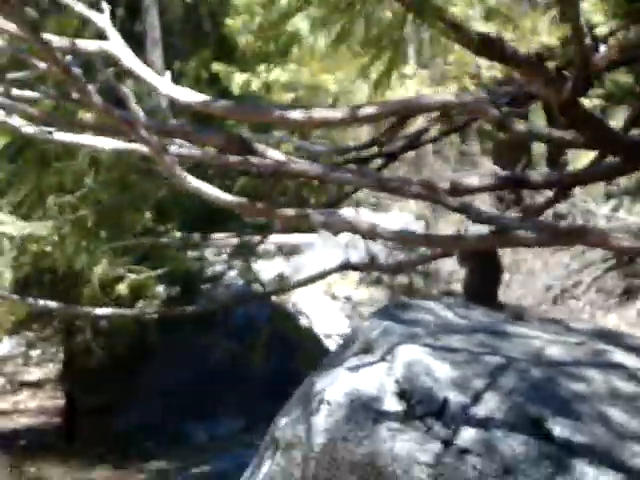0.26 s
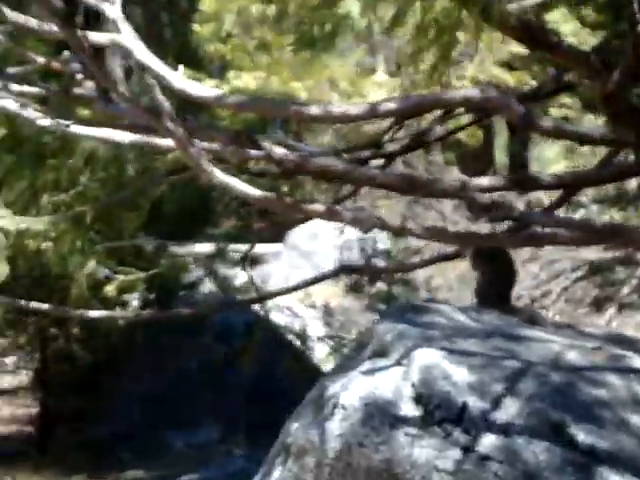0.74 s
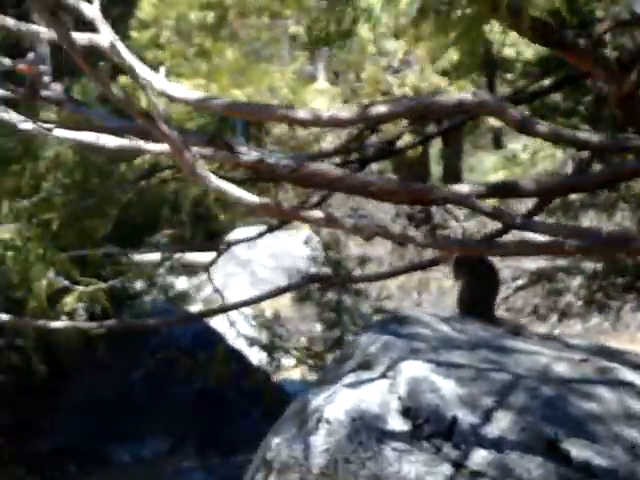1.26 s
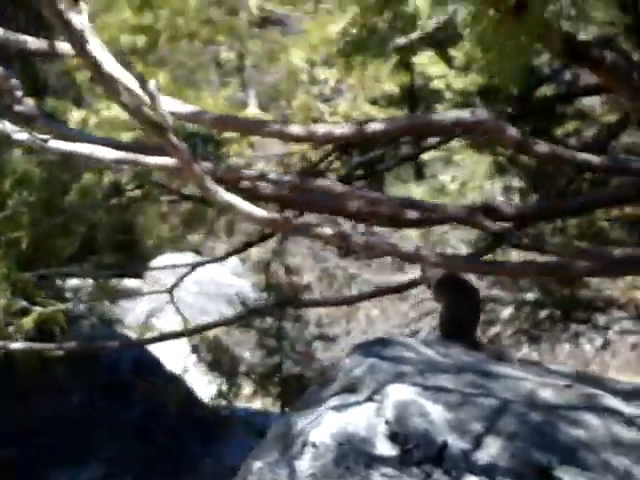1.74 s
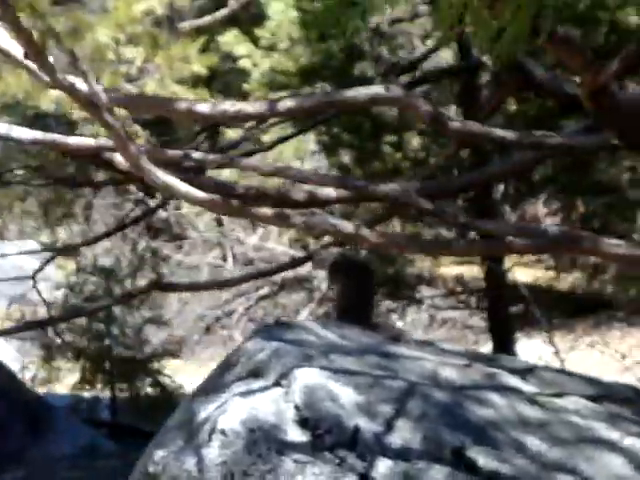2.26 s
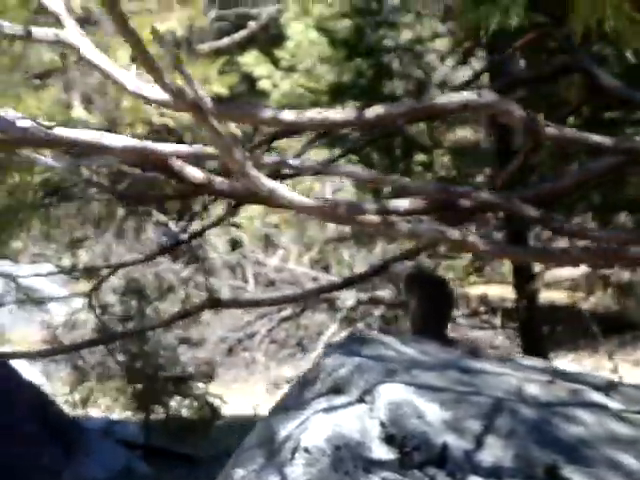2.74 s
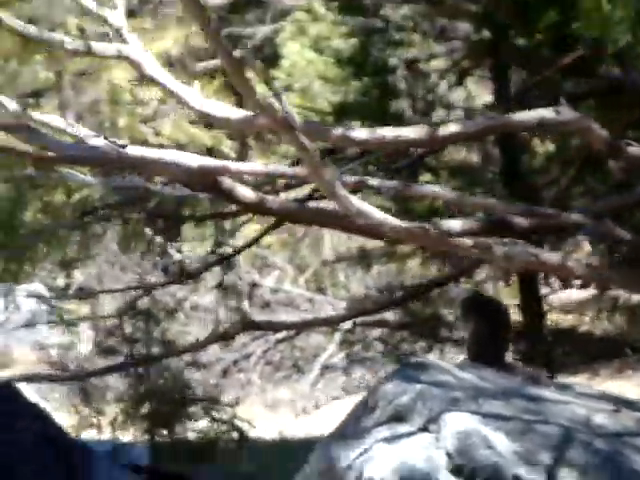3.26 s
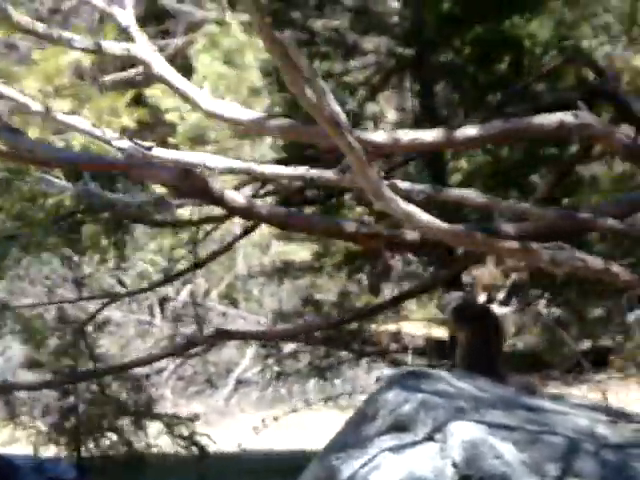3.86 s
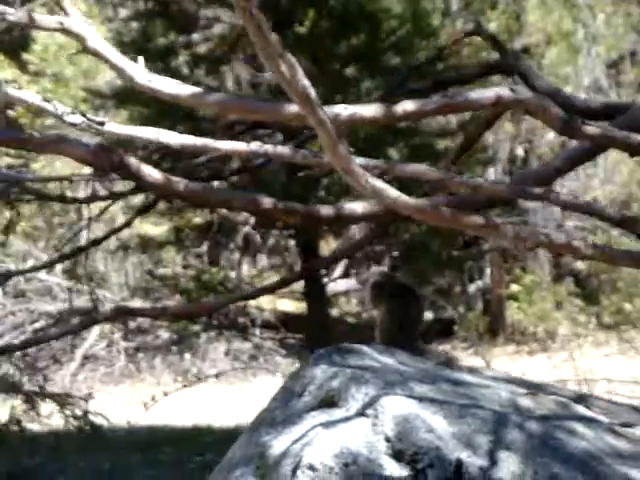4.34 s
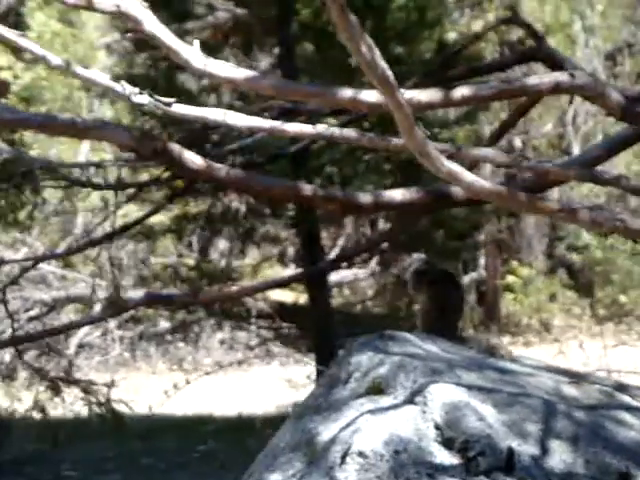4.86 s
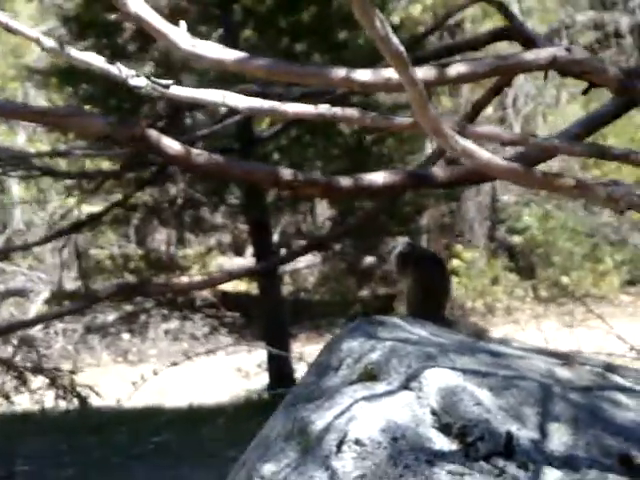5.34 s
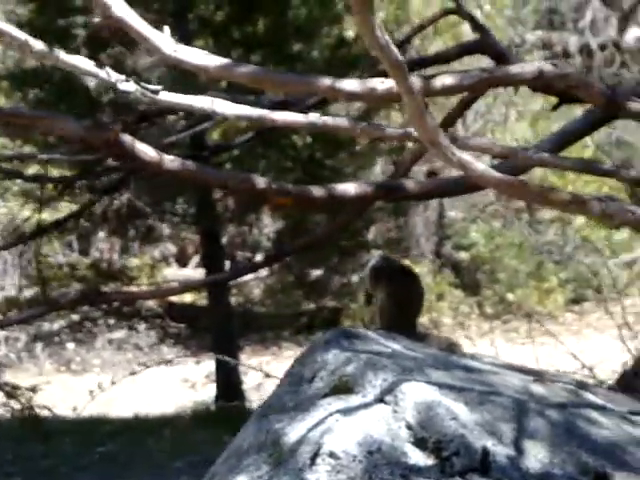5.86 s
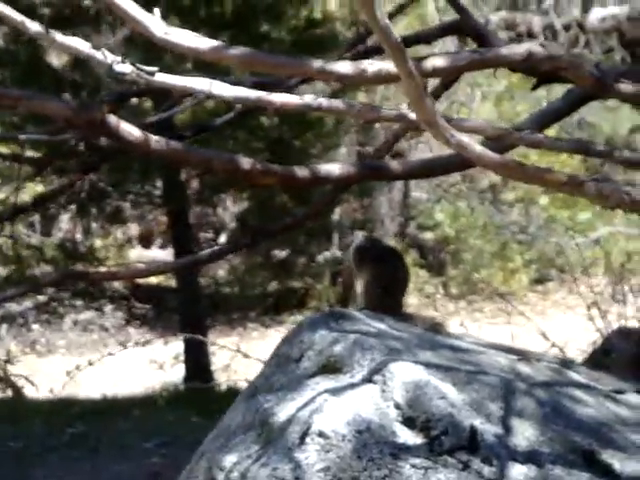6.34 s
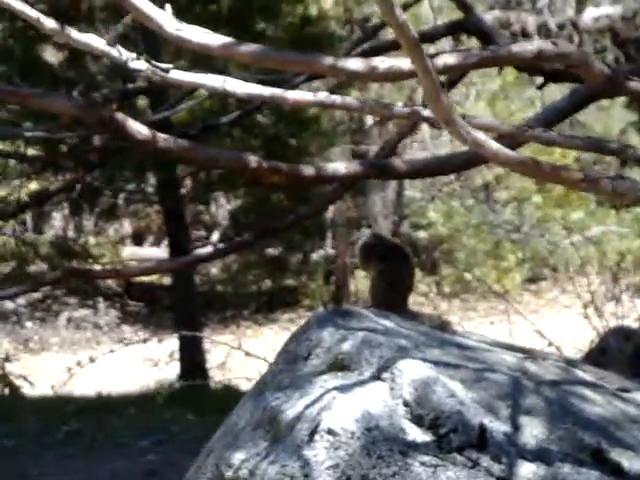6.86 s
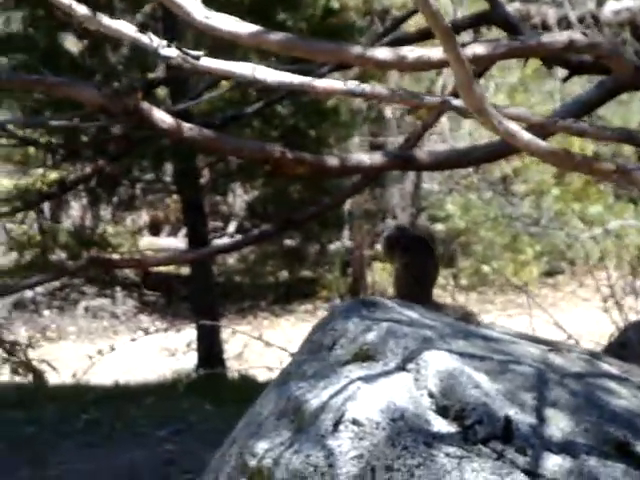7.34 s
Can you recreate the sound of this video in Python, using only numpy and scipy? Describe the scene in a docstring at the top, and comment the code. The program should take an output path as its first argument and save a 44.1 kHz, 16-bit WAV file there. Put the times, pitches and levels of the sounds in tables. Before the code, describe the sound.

A squirrel on a boulder scolds with eleven sharp, evenly spaced barking chirps in a pine forest, while a jay-like bird rasps midway.

```python
"""A pine forest heard at one microphone: air rushes in the pines throughout, as shaped, patchy noise.
From the first moments a squirrel on a boulder scolds. Each of its eleven calls is a rough bark of noise
puffs through a mouth, an arched whistling tone and fainter after-barks; trunks scatter them in noise tails.
The hand-held camera soon ticks and bumps, in short rings and low pushes of noise. Near the middle a jay-like
bird rasps five times in fluttering harmonics, scattered too; then a far bird calls in faint narrow noise."""
import sys
import numpy as np
from scipy import signal
from scipy.fft import rfft, irfft, next_fast_len
from scipy.io import wavfile
from scipy.ndimage import uniform_filter1d, map_coordinates

SR = 44100
rng = np.random.default_rng(int(sys.argv[2]) if len(sys.argv) > 2 else 0)


def unload_audio(sound):
    """Save the sound as a 16-bit wav file, at the path given as the first command line argument."""
    columns = np.transpose(np.atleast_2d(sound))
    # keep every value between -1 and 1, then stretch to whole-number steps
    steps = np.round(np.clip(columns, -1, 1) * 32767)
    wavfile.write(sys.argv[1], SR, steps.astype(np.int16))


def undo_db(level):
    """Turn decibels back into plain size, where 20 dB means ten times bigger."""
    steps = np.asarray(level, float) / 20
    return 10 ** steps


N = 335160
T = np.arange(N) / SR


def unit(x):
    """Scaled to rms 1."""
    return x / np.sqrt(np.mean(x ** 2) + 1e-20)


def along(points, hz):
    """Interpolates (Hz, value) points on a log frequency axis."""
    f, v = np.transpose(points)
    return np.interp(np.log(hz + 1), np.log(f + 1), v)


def wobble(rate, size=N):
    """A smooth random curve, rate knots a second."""
    knots = rng.standard_normal(int(size * rate / SR) + 4)
    return map_coordinates(knots, [np.arange(size) * rate / SR])


def filtered(x, response):
    """x times a complex response of frequency."""
    m = next_fast_len(x.shape[-1] + 8192)
    spectrum = rfft(x, m) * response(np.fft.rfftfreq(m, 1 / SR))
    return irfft(spectrum, m)[..., :x.shape[-1]]


def resonances(modes):
    """Causal response of (Hz, width in Hz, dB) resonances, summed with alternating sign."""
    def response(f):
        return sum((-1) ** k * undo_db(db) * 1j * f * width / (hz * hz - f * f + 1j * f * width)
                   for k, (hz, width, db) in enumerate(modes))
    return response


def add(track, s, sound):
    """Mixes a sound in at time s."""
    part = track[round(s * SR):][:len(sound)]
    part += sound[:len(part)]


# Spectrum of the air in the pines. Each row: frequency in Hz, relative density in dB per Hz.
AIR_SPECTRUM = [(15, -54), (40, -26), (65, -13.5), (85, -12.5), (150, -10), (215, -4), (320, -2.5),
                (600, -1), (950, -2.5), (1400, -7), (1800, -12.5), (2500, -16), (4000, -34)]
# Slow breathing of the air at the microphone. Each row: time in seconds, rms level in dB.
AIR_LEVEL = [(0.0, -51.5), (0.27, -52), (6.14, -51), (6.37, -49.5), (6.9, -51.5), (7.41, -51), (7.6, -49)]


def air(patchy_db=1.29):
    """A steady rush: noise with faint patches in time and frequency, breathing slowly."""
    z = signal.stft(rng.standard_normal(N), nperseg=512)[2]
    field = uniform_filter1d(rng.standard_normal(z.shape), 6, 0)
    field = uniform_filter1d(field, 14, 1)
    noise = signal.istft(z * undo_db(patchy_db * unit(field)), nperseg=512)[1][:N]
    rush = unit(filtered(noise, lambda f: undo_db(along(AIR_SPECTRUM, f))))
    s, db = np.transpose(AIR_LEVEL)
    return undo_db(np.interp(T, s, db)) * rush


# How long the forest rings around the calls. Each row: frequency in Hz, time to fall by 60 dB in seconds.
FOREST_DECAY = [(1500, 0.6), (3000, 0.38), (6000, 0.29), (10000, 0.48)]


def forest(x):
    """Trunks and rocks scatter the calls; each third of a second meets a new random tail."""
    out, step = np.zeros(N), SR // 3
    for start in range(0, N, step):
        hz, t, z = signal.stft(rng.standard_normal(SR // 2), SR, nperseg=256)
        decay = undo_db(-60 * t / along(FOREST_DECAY, hz)[:, None])
        tail = signal.istft(z * decay, SR, nperseg=256)[1]
        echo = signal.fftconvolve(x[start:start + step], tail / np.linalg.norm(tail))
        add(out, start / SR + .004, echo)
    return out


# Ticks of the camera body, at the microphone.
# Each row: start in seconds, level in dB, ring in Hz, crack relative to the ring in dB.
TICKS = [(0.7295, -34, 646, -17), (1.4708, -34, 1130, -11), (1.4885, -41, 1330, 1),
         (1.5008, -28, 825, -5.5), (1.6405, -37, 810, -4.5), (1.795, -10, 1163, -20),
         (1.8031, -27, 1320, -14), (2.6917, -37, 1350, 0), (2.7088, -32.5, 790, -10),
         (2.7305, -37, 840, -13), (2.7555, -37.5, 680, -7), (4.9535, -30.5, 1020, -18),
         (5.561, -39.5, 2110, -8), (6.468, -34, 965, -20), (6.506, -34, 684, -16.5)]
# Soft bumps of the hand-held camera. Each row: middle in seconds, level in dB, resonance in Hz, length in seconds.
BUMPS = [(1.412, -48, 425, 0.048), (2.63, -49.5, 119, 0.039), (3.8, -59.5, 154, 0.041),
         (5.166, -62, 80, 0.0583), (6.49, -48.5, 148, 0.04)]


def handling(contact_s=0.00048):
    """Plastic ticks crack and ring for a cycle or two; bumps are short low pushes."""
    out, t = np.zeros(N), np.arange(SR // 50) / SR
    crack_band = resonances([(3000, 3500, 0)])
    for s, db, hz, crack_db in TICKS:
        blow = (t / contact_s) ** 2 * np.exp(2 - 2 * t / contact_s)
        rest = 0.073 * np.exp(-t / 0.0045) * (1 - np.exp(-t / contact_s))
        swell = blow + rest
        noise = rng.standard_normal(len(t))
        crack = unit(filtered(noise, lambda f: crack_band(f) / (1 + (f / 5000) ** 6)))
        ring = -np.tanh(1.28 * swell * np.sin(2 * np.pi * hz * t))  # the shell stiffens at full swing
        tick = filtered(ring + undo_db(crack_db) * swell * crack, lambda f: f ** 2 / (f ** 2 + 200.0 ** 2))
        add(out, s, undo_db(db) * tick)
    for s, db, hz, length in BUMPS:
        size = round(length * SR)
        body = resonances([(hz, 60, 0)])
        push = filtered(rng.standard_normal(size), lambda f: body(f) ** 2 * f / (f + hz))
        add(out, s - length / 2, undo_db(db) * np.hanning(size) * unit(push))
    return out


# Faint notes of the far bird.
# Each row: start in seconds, rms level before the swell in dB, lower band in Hz, length in seconds.
FAR_CALLS = [(4.815, -51.5, 1360, 0.064), (5.212, -53, 1386, 0.18), (5.743, -53.5, 1370, 0.16),
             (6.2, -53.5, 1330, .1), (6.675, -55, 1317, 0.12)]


def far_calls():
    """Hoarse notes blurred by distance: two narrow bands of noise under a smooth swell."""
    out = np.zeros(N)
    for s, db, hz, length in FAR_CALLS:
        size = round(length * SR)
        throat = resonances([(hz, 80, 0), (1.24 * hz, 90, -3)])
        note = filtered(rng.standard_normal(size), lambda f: throat(f) ** 2)
        add(out, s, undo_db(db) * np.hanning(size) ** 0.19 * unit(note))
    return out


# Rasps of the jay-like bird.
# Each row: half-way point of the attack in seconds, length before the release in seconds,
# level at the top of the swell in dB.
RASPS = [(3.492, .27, -39.5), (3.858, 0.28, -40), (4.228, 0.28, -40), (4.619, 0.26, -41.5),
         (4.989, .29, -41.5)]
# Colour the beak gives the voice. Each row: frequency in Hz, gain in dB.
BEAK = [(1300, -24), (1700, -12), (1950, -3), (2640, -4.5), (3320, -1.5), (4000, -3), (5600, -6),
        (7200, -19.5), (8400, -23.5), (10500, -34)]


def rasps(pitch_hz=1110, flutter_rate=450, breath=2.0, drift_db=2.5):
    """A harsh voice: each harmonic is smeared to a band by fast random flutter, over strong breath noise."""
    attack_s, release_s = .06, 0.044
    swell_drop_db, peak_share = 9.5, 0.8  # the swell peaks at that share of the length
    out = np.zeros(N)
    for s, length, db in RASPS:
        t = np.arange(0, length + release_s, 1 / SR)
        size = len(t)
        phase = 2 * np.pi * np.cumsum(pitch_hz * (1 + .018 * wobble(9, size))) / SR
        stack = 0
        for k in range(2, 8):
            drift = undo_db(drift_db * wobble(8.2, size))  # slow change in the harmonic's strength
            stack = stack + drift * wobble(flutter_rate, size) * np.sin(k * phase)
        source = unit(stack) + breath * rng.standard_normal(size)
        voice = filtered(source, lambda f: undo_db(along(BEAK, f)))
        high = filtered(voice, lambda f: 1 / (1 + (3900 / (f + 1)) ** 6))
        # the rasp dulls as it goes: its treble share slides from full to -9 dB, within limits
        share = np.clip(undo_db(np.interp(t, [0, length], [0, -9])), .05, .97)
        voice = share * unit(high) + np.sqrt(1 - share ** 2) * unit(voice - high)
        swell_db = -swell_drop_db * (t / (peak_share * length) - 1) ** 2
        edges = np.clip(np.minimum(t / attack_s, (t[-1] - t) / release_s), 0, 1) ** 2
        add(out, s - attack_s / 2, edges * undo_db(db + swell_db) * voice)
    return out


# Whistles of the squirrel on the boulder.
# Each row: top of the arch in seconds, relative level in dB, pitch at the top in Hz,
# pitch one rise time earlier in Hz, fall time in seconds.
WHISTLES = [(0.286, -32.5, 2950, 2075, .016), (1.038, -33, 2896, 2303, 0.02),
            (1.772, -32.5, 2860, 2326, .019), (2.463, -31, 2975, 2495, 0.025),
            (3.101, -31, 3006, 2120, 0.0144), (3.808, -27.5, 3107, 2570, 0.0182),
            (4.546, -30.5, 3255, 2800, .018), (5.318, -34.5, 2920, 2595, 0.02),
            (6.066, -34.5, 2955, 2400, .024), (6.739, -32.5, 3090, 2520, .011),
            (7.508, -32, 2960, 2520, 0.018)]
# Make-up of the whistle. Each row: multiple of the pitch, relative level in dB.
OVERTONES = [(1, 4), (2, -20.5), (3, -34.5)]


def whistles(rise_s=.018, droop=0.052, breath=0.55):
    """A tone that hooks up to its top and droops, with hoarse overtones."""
    out = np.zeros(N)
    for s, db, top_hz, start_hz, fall in WHISTLES:
        t = np.arange(-1.1 * rise_s, 4.0 * fall, 1 / SR)
        size = len(t)
        u = np.where(t < 0, t / rise_s, t / fall)  # -1 to 0 climbs, above 0 droops
        pitch = top_hz - u ** 2 * np.where(t < 0, top_hz - start_hz, droop * top_hz)
        hoarse = 1.1 * np.clip(-u, 0, 1)  # the voice clears as it climbs
        phase = 2 * np.pi * np.cumsum(pitch * (1 + 0.0055 * wobble(273, size))) / SR
        tone = 0
        for k, level in OVERTONES:
            flutter = 1 + ((k - .85) * k + hoarse) * breath * wobble(700, size)
            tone = tone + undo_db(level) * flutter * np.sin(k * phase)
        arch_db = -np.where(t < 0, 17, 12) * np.abs(u + 0.074) ** 1.7
        add(out, s + t[0], np.sqrt(2) * undo_db(db + arch_db) * tone)
    return out


# Rough barks of the squirrel, opening each call.
# Each row: time during the rise in seconds, relative level in dB, length in seconds, mouth resonance in Hz.
BARKS = [(0.242, -17, 0.023, 3420), (0.992, -19, 0.039, 3340), (1.7292, -16, 0.027, 3330),
         (2.4246, -16, 0.028, 3330), (3.0554, -16.5, 0.023, 3360), (3.7687, -15, 0.035, 3460),
         (4.5016, -15, 0.038, 3490), (5.277, -17.5, 0.038, 3530), (6.028, -16, 0.031, 3400),
         (6.7024, -15, 0.029, 3390), (7.4666, -19.5, 0.039, 3370)]
# Fainter after-barks of the same squirrel. Each row: time during the rise in seconds, relative level in dB.
AFTER_BARKS = [(0.348, -34), (0.398, -45.5), (1.0996, -33.5), (1.149, -41), (1.839, -36), (1.897, -46),
               (2.5354, -38.5), (2.588, -44.5), (3.167, -27.5), (3.223, -43), (3.881, -29.5),
               (4.613, -26.5), (5.3877, -29.5), (5.441, -41.5), (6.135, -29.5), (6.199, -34), (6.8147, -29),
               (6.8877, -42), (7.5776, -32.5)]
# The open mouth, before its peaks are sharpened.
# Each row: multiple of the mouth resonance, width in Hz, strength in dB.
MOUTH = [(.63, 496, -11), (0.819, 450, -14.5), (0.998, 495, 35.5), (1.21, 563, -10)]
# Upper resonances at the teeth, before sharpening. Each row: frequency in Hz, width in Hz, strength in dB.
TEETH = [(4050, 450, -7), (5240, 570, 2), (5940, 280, 0), (6850, 850, -6.5), (8100, 880, -12)]


def bark_rows():
    """Barks and after-barks as (s, dB, length, mouth Hz, treble dB); faint ones open the mouth less."""
    after_length_s, mouth_hz, faint_db, sag_hz_per_db = 0.019, 3390, -29, 23
    rows = [(*row, -9) for row in BARKS]
    for s, db in AFTER_BARKS:
        hz = mouth_hz - sag_hz_per_db * max(faint_db - db, 0)
        rows.append((s, db, after_length_s, hz, -15.5))
    return rows


def through(puffs, modes):
    """The puffs sounded through sharpened resonances, at rms 1."""
    shape = resonances(modes)
    return unit(filtered(puffs, lambda f: shape(f) * np.abs(shape(f)) ** 0.53))


def barks(flap_hz=420, rough=1.0, rise_s=0.0067, closing=0.88, treble_outlasts=1.2):
    """Vocal folds flap irregularly; each flap lets a puff of noise into the mouth, which closes as the bark ends."""
    out, t = np.zeros(N), np.arange(SR // 10) / SR
    size = len(t)
    for s, db, length, hz, treble_db in bark_rows():
        phase = np.cumsum(flap_hz * (1 + 0.32 * wobble(300, size))) / SR % 1
        puffs = (rough + np.exp(-6 * phase)) * rng.standard_normal(size)
        wide = through(puffs, [(k * hz, w, level) for k, w, level in MOUTH])
        narrow = through(puffs, [(k * hz * closing, w, level) for k, w, level in MOUTH])
        treble = through(puffs, TEETH)
        turn = np.clip(t / (1.67 * length), 0, 1) * np.pi / 2  # from wide to narrow
        # the upper resonances outlast the mouth
        lasting = (1 + (t / length) ** 4) / (1 + (t / (treble_outlasts * length)) ** 4)
        voice = np.cos(turn) * wide + np.sin(turn) * narrow
        voice = voice + undo_db(treble_db) * np.clip(t / 0.0074, 0, 1) * lasting * treble
        voice = voice / uniform_filter1d(np.abs(voice), size=90) ** 0.83  # the breath pushes evenly
        rise = rise_s * np.clip(1 + (db + 16.5) / 25, .15, 1)  # lighter barks start faster
        main = 1 / (1 + (t / max(length, .004)) ** 6)
        rest = 0.19 / (1 + (t / 0.081) ** 6)  # a hoarse rest trails the bark
        effort = np.clip(t / rise, 0, 1) ** 1.57 * np.exp(-t / 0.033) * (rest + main)
        level = undo_db(db - 9.0 + 1.6 * wobble(184, size))
        add(out, s - 0.67 * rise, level * effort * voice)
    return out


def scene():
    """All sources at one microphone."""
    bark, whistle, bird = barks(), whistles(), rasps()
    echo = forest(undo_db(-10.5) * bark + undo_db(-15.5) * whistle + undo_db(-3.5) * bird)
    return (bark + whistle + bird + echo + far_calls() + handling() + air())[None]


def top_cut(x):
    """Nothing passes above the cut-off."""
    return signal.sosfilt(signal.butter(12, 10070, fs=SR, output="sos"), x)


# Hiss of the microphone. Each row: frequency in Hz, relative density in dB per Hz.
HISS = [(500, -26.5), (1500, -4.5), (3300, -3), (5400, -5.5), (9900, -9.5)]


def record(dry):
    """The microphone hisses at a steady level; the camera keeps nothing above its band limit."""
    hiss_db, top_hz = -58.5, 10100
    noise = rng.standard_normal(N)
    hiss = undo_db(hiss_db) * unit(filtered(noise, lambda f: undo_db(along(HISS, f))))
    mix = filtered(dry + hiss, lambda f: f < top_hz)
    return top_cut(mix)


dry = scene()
out = record(dry)
unload_audio(out)
```